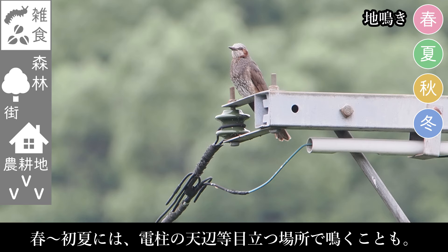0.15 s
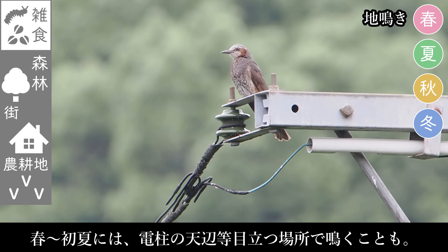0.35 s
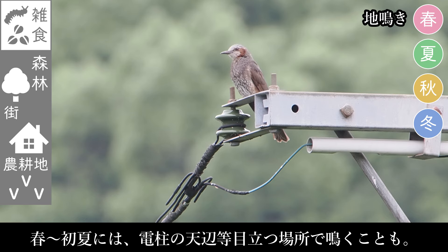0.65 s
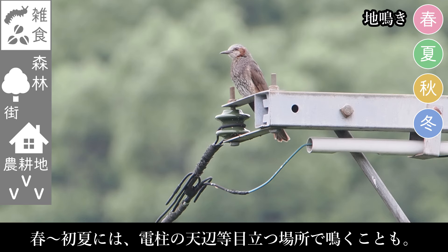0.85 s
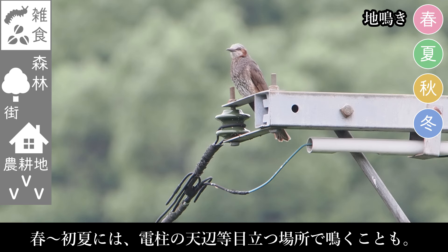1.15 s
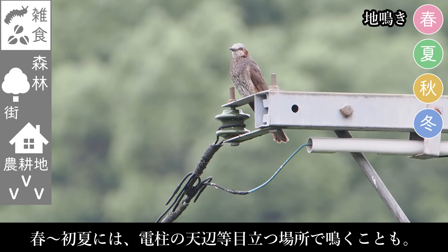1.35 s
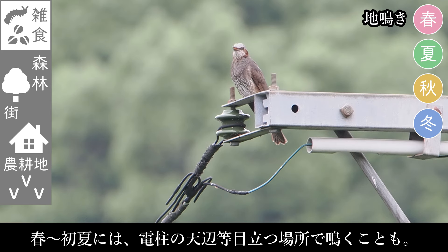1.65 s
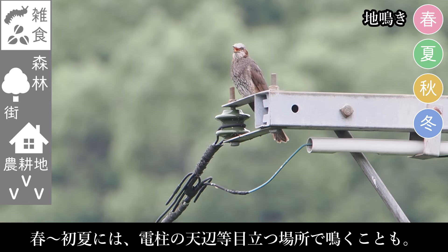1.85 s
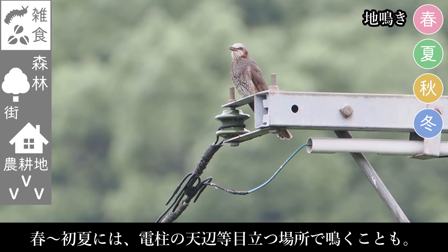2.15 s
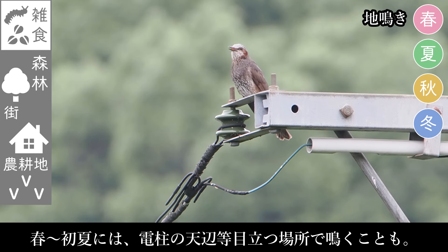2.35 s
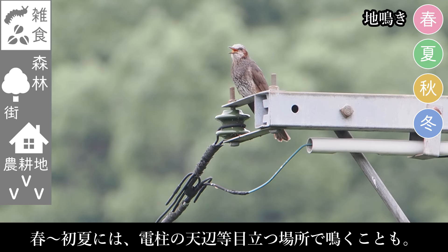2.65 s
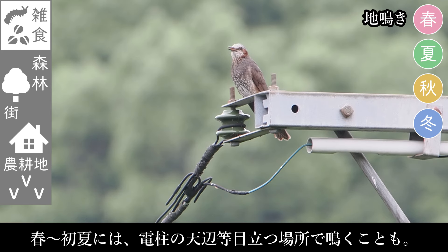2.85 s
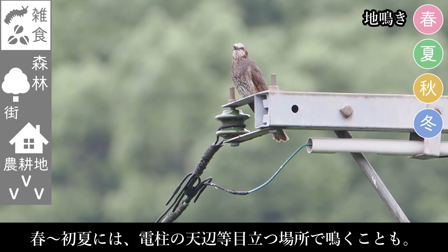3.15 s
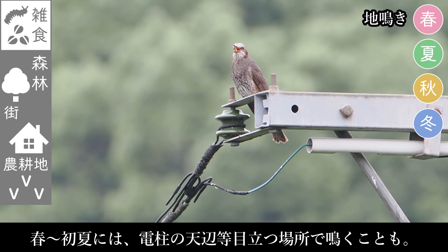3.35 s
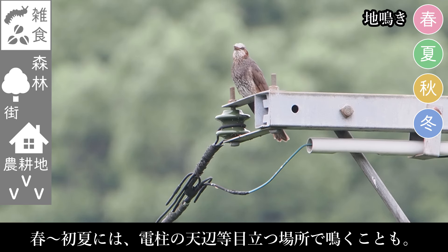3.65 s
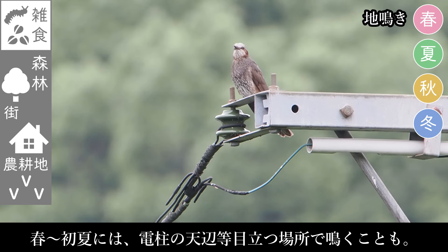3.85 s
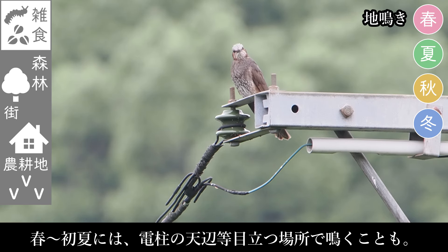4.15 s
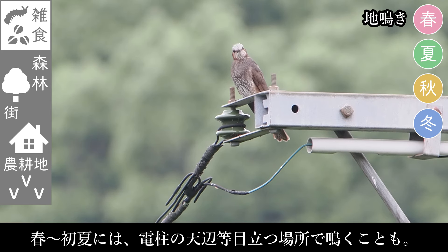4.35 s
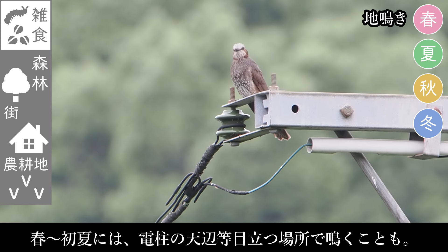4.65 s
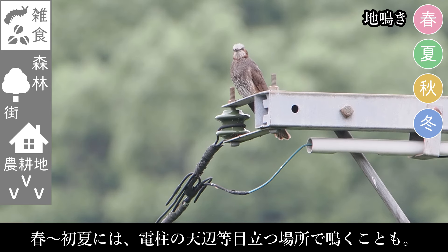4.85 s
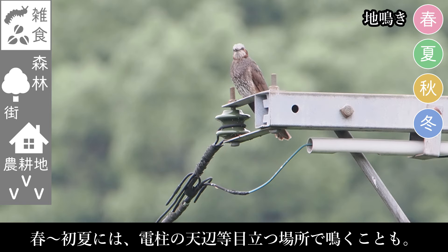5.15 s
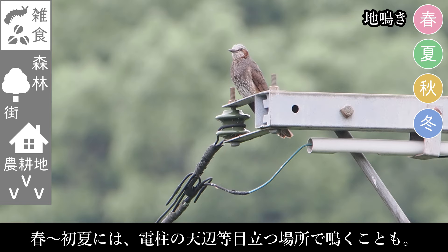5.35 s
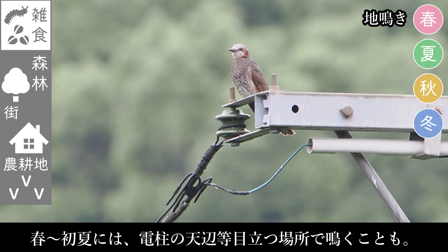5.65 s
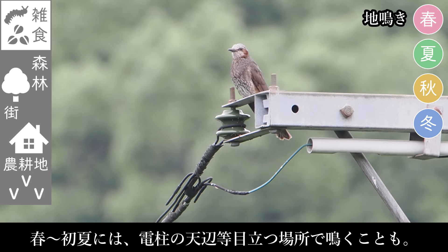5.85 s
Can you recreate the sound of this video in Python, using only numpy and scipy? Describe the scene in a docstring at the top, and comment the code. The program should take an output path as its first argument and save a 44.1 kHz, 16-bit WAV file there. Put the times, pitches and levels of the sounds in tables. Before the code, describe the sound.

A bulbul on a utility pole gives six shrill, raspy calls, the last breaking into chatter; a distant warbler answers with whistle and flourish.

```python
"""A bulbul on a pole, close to the microphones, calls six shrill arches: gliding partials with warble and rasp.
The last one breaks into two-voiced chatter of short glides. A warbler further off answers with a nearly pure
whistle and a quick flourish; far birds give blurred chirps. Dull claps, clicks ringing broad resonances, carry
from the left over a wooded valley. Behind lie filtered noises: a soft rush and a wavering hum on the left,
a draught at the microphones, leaves, low traffic rumble and microphone hiss."""
import sys
import numpy as np
from scipy import signal
from scipy.fft import rfft, irfft, next_fast_len
from scipy.io import wavfile
from scipy.ndimage import uniform_filter1d

SR = 44100
rng = np.random.default_rng(int(sys.argv[2]) if len(sys.argv) > 2 else 0)


def int16_out(signal):
    """Quantize to a 16-bit WAV file."""
    q = np.round(np.clip(np.atleast_2d(signal).T, -1, 1) * 32767)
    wavfile.write(sys.argv[1], SR, q.astype(np.int16))


N = 264732

# Overtones of the near bird, strong on low notes: (main line f/Hz, level/dB at 1.5 x, level/dB at 2 x)
OVERTONES = [(2200, 3.5, 5.5), (2800, -13.5, -13.5), (3300, -15, -25), (4070, -11, -34.5),
             (4900, -13.5, -35.5), (5700, -33, -41.5), (6700, -28.5, -39), (7400, -23, -37)]
# Colour of each kind of call: (shift/dB at 1.5 x, shift/dB at 2 x, shift/dB at 2 x on low notes,
# level/dB at 2.5 x and level/dB at 0.5 x, both against the overtone at 1.5 x)
VOICES = dict(bow=(-6, 7.5, 1.5, -14, -21), arch=(-0.6, -1.5, -0.9, -21, -5),
          squeal=(-22.5, 6.5, 8.5, -21, 1.5), hook=(-6.5, 8, -3, -20, 14), hoarse=(-11, 15, -12, -19, -18))
# Slow second vibration by kind of call: mean rate f/Hz and greatest pitch swing f/Hz
WARBLE_HZ = dict(arch=277, squeal=267)
WARBLE_DEPTH_HZ = dict(arch=457, squeal=452)
# Single chatter notes: (middle t/s, nominal length/ms, start f/Hz, end f/Hz, peak level/dB)
CHATTER = [(3.642, 4.4, 3140, 4170, -19.5), (3.65, 6, 3690, 3630, -26), (3.71, 12, 4120, 5970, -26.5),
           (3.722, 11, 4800, 5900, -31), (3.734, 5, 5800, 6070, -33), (3.741, 6, 5900, 4500, -30),
           (3.746, 6.5, 4300, 3900, -21), (3.759, 23, 2476, 3840, -33), (3.778, 7.8, 3480, 3420, -29),
           (3.798, 6, 2440, 3870, -30), (3.808, 17, 3184, 2800, -29), (3.82, 8, 2760, 2840, -34),
           (3.835, 6.6, 2540, 2650, -34)]


def bulbul():
    """The syrinx vibrates at half the main line; a second, slow vibration warbles pitch and level."""
    out = np.zeros(N)
    line_hz, *overtone_db = np.transpose(OVERTONES)
    for rows, kind, warble in phrases():
        i, edge, (hz, db, rasp) = stroke(rows)
        rasp = np.clip(rasp, 0, 1)
        *shift_db, low_db, fifth_db, sub_db = VOICES[kind]

        # the colour of each voice shows once the note is up
        up = np.clip((hz - 2500) / 1200, 0, 1)
        odd_db, even_db = (np.interp(hz, line_hz, o) + up * s for o, s in zip(overtone_db, shift_db))
        even_db = even_db + low_db * np.clip((3700 - hz) / 700, 0, 1)

        warble_hz, depth_hz = 0, 0 * hz
        if warble:
            begin_s, end_s = warble
            share = np.clip((i / SR - begin_s) / (end_s - begin_s), 0, 1)
            warble_hz, depth_hz = WARBLE_HZ[kind], WARBLE_DEPTH_HZ[kind] * np.sin(np.pi * share)
        beat = 2 * np.pi * np.cumsum(warble_hz * (1 + 0.034 * walk(66, len(i)))) / SR
        phase = 2 * np.pi * np.cumsum(hz + depth_hz * np.sin(beat)) / SR

        third_db = even_db - 12 - 12 * up - 8 * depth_hz / 400 - 6 * rasp
        # (multiple of the main line, level/dB)
        partials = [(.5, odd_db + sub_db), (1, 0 * db), (1.5, odd_db), (2, even_db),
                    (2.5, odd_db + fifth_db - 6 * rasp), (3, third_db)]
        tone = 0
        for k, partial_db in partials:
            # in a rasp the cycles lose their order: each line spreads into a band
            carrier = chaos(rasp, 2400, len(i)) * np.exp(1j * k * phase)
            tone = tone + undb(partial_db) * carrier.imag * (k * hz < 16000)
        waver_db = (.6 + 1.2 * rasp) * walk(150, len(i))
        throb_db = 3.4 * np.sin(beat + 1.7) * depth_hz / 400 + waver_db
        out[i] += np.sqrt(2) * edge * tone * undb(db + throb_db)
    chatter = chips(CHATTER + trills(), -29.5, 0.27)
    # the small throat radiates nothing low and little at the very top
    throat = signal.butter(4, [2300, 13500], "band", fs=SR, output="sos")
    return signal.sosfilt(throat, out + chatter)


# First call, a clear bow ending in a scratch: (t/s, main line f/Hz, level/dB, rasp 0-1)
BOW = [(1.662, 1920, -56, 0.3), (1.676, 2940, -41, 0.6), (1.69, 3425, -32.5, 0.26),
       (1.71, 3860, -28.5, 0.06), (1.735, 4074, -25, .02), (1.755, 3976, -22.5, 0.14),
       (1.763, 3460, -24, .15), (1.77, 2600, -32, 0.7), (1.776, 2897, -31, .9), (1.782, 4200, -28, 1),
       (1.805, 3350, -30, .7), (1.824, 3300, -34, .9), (1.83, 4600, -27.5, 0.2), (1.836, 2890, -32.5, .9),
       (1.85, 2500, -36.5, .9)]
# Hoarse breathiness beneath the chatter: (t/s, main line f/Hz, level/dB, rasp 0-1)
UNDERTONE = [(3.636, 3650, -40.5, 0.74), (3.71, 4580, -40.5, .99), (3.75, 4010, -65, 1),
             (3.85, 2700, -63, 0.78)]
# Last call, a loud warbled squeal: (t/s, main line f/Hz, level/dB, rasp 0-1)
SQUEAL = [(3.418, 1800, -60, .2), (3.425, 2249.5, -45.5, .1), (3.43, 2616, -34.5, .2),
          (3.44, 3041, -29.5, .02), (3.455, 3850, -28.5, .02), (3.475, 4284, -24.5, 0.16),
          (3.505, 4720.5, -23, 0.2), (3.53, 4520.5, -20, 0.12), (3.56, 4200, -21, 0.07),
          (3.578, 4100, -22.5, 0.1), (3.594, 4100, -26.5, .2)]
# Ending of the squeal: (burst t/s, level/dB, rise of the hook's last two points f/Hz, lift of the hook level/dB)
SQUEAL_END = (3.6, -21.5, 350, 1.5)
# Span of the squeal's warble: (begin t/s, end t/s)
SQUEAL_WARBLE_S = (3.45, 3.595)
# Four high arches of one shape:
# (start t/s, burst t/s, top f/Hz, level/dB, level along the top/dB, lift of the closing hook level/dB)
ARCHES = [(2.056, 2.178, 7530, -19, -29.5, 3), (2.395, 2.51, 7540, -19.5, -32.5, -0.2),
          (2.738, 2.85, 7260, -22, -35, -.1), (3.101, 3.218, 7480, -19, -29.5, -3)]
# Low opening step and jump: (t/s after the start, main line f/Hz, level/dB against the arch, rasp 0-1)
ARCH_ONSET = [(.002, 2230, -38, .4), (.007, 2402, -22.5, .7), (.011, 4040, -6, 0.5), (.018, 3945, -11, .1),
              (.026, 4200, -10, .15), (.033, 5637, -8.5, .2)]
# Climb to the top and plunge: (t/s before the burst, share of top f, level/dB against the top)
ARCH_TOP = [(.062, .9, -1), (.037, .98, -2.5), (.022, 1.005, 2.5), (.012, .965, -5), (.008, .84, -0.5),
            (.004, .56, 7.5)]
# Warble of an arch: (begin t/s after the start, end t/s before the burst)
ARCH_WARBLE_S = (.015, 0.017)


def phrases():
    """The bird's long calls as rows (t/s, f/Hz, level/dB, rasp) with kind and span of warble."""
    burst, db, lift_hz, hook_db = SQUEAL_END
    end = np.array(coda(burst, db, hook_db)[:-1])
    end[-2:, 1] += lift_hz
    calls = [(BOW, "bow", None), (UNDERTONE, "hoarse", None),
             (SQUEAL + list(end[:2]), "squeal", SQUEAL_WARBLE_S), (end[1:], "hook", None)]
    after_start, before_burst = ARCH_WARBLE_S
    for start, burst, top_hz, db, top_db, hook_db in ARCHES:
        rows = [(start + s, hz, db + d, rasp) for s, hz, d, rasp in ARCH_ONSET]
        rows += [(burst - s, share * top_hz, top_db + d, .1) for s, share, d in ARCH_TOP]
        rows += coda(burst, db, hook_db)
        calls.append((rows, "arch", (start + after_start, burst - before_burst)))
    return calls


# Low burst, hoarse gap and small hook: (t/s after the burst, main line f/Hz, level/dB against the call, rasp 0-1)
CODA = [(0, 2858, -0.5, .25), (.007, 2830, -22.5, 1), (.012, 3142, -3, .8), (.018, 4822, -18.5, .2),
        (.024, 4430, -5.5, .1), (.033, 4150, -9.5, .1), (.038, 3104, -11, .65), (.047, 3100, -15.5, .9)]


def coda(burst, db, hook_db):
    """The ending placed at its burst; the hook is the part from the fifth row on."""
    return [(burst + s, hz, db + d + hook_db * (k > 3), rasp)
            for k, (s, hz, d, rasp) in enumerate(CODA)]


# Runs of evenly spaced chatter notes: (first t/s, last t/s, nominal length/ms, glide f/Hz,
# first f/Hz, last f/Hz, first level/dB, last level/dB)
TRILLS = [(3.667, 3.697, 6.5, 120, 3950, 4250, -20, -22), (3.663, 3.702, 5.4, -400, 4630, 5650, -32, -31.5),
          (3.675, 3.728, 7.8, -350, 2570, 2790, -31, -31.5),
          (3.77, 3.783, 6, -950, 2720, 2690, -23.5, -23.5), (3.789, 3.841, 7, -200, 2705, 2490, -32, -39.5)]


def trills():
    """The runs, one note about every 14 ms, spelled out as single glides."""
    notes = []
    for first, last, ms, glide_hz, first_hz, last_hz, first_db, last_db in TRILLS:
        count = round((last - first) / .014) + 1
        for s, hz, db in np.linspace((first, first_hz, first_db), (last, last_hz, last_db), count):
            notes.append((s, ms, hz - glide_hz / 2, hz + glide_hz / 2, db))
    return notes


# Long whistle from further off: (t/s, f/Hz, level/dB)
WHISTLE = [(4.05, 1380, -70), (4.45, 1383, -55), (4.6, 1392, -58), (4.72, 1392, -49), (4.8, 1384, -45.5),
           (4.825, 1352, -63)]
# Quick flourish, one list per note: (t/s, f/Hz, level/dB)
FLOURISH = [
    [(4.862, 1600, -47), (4.875, 1482, -34), (4.895, 1263, -42), (4.912, 1853, -32), (4.921, 2037, -34),
     (4.932, 2070, -53.5)],
    [(4.982, 3140, -47), (4.988, 2673, -32), (4.995, 2564, -24.5), (5.004, 3026, -28.5), (5.009, 3120, -54)],
    [(5.014, 2950, -46.5), (5.02, 2850, -27), (5.027, 2030, -28)],
    [(5.084, 2930, -34), (5.092, 2153, -31.5), (5.101, 1736, -34), (5.12, 2253, -29), (5.144, 2680, -24),
     (5.15, 3250, -33.5), (5.158, 3840, -50.5), (5.17, 3670, -35.5)],
    [(5.238, 4070, -56), (5.246, 2890, -29), (5.258, 3040, -30), (5.272, 2478, -28.5), (5.287, 2136, -30.5),
     (5.315, 1664, -37.5), (5.332, 1216, -45)],
]


def warbler():
    """Nearly pure tones: a steady swelling whistle, then fast glides that flutter on their way through the leaves."""
    out = np.zeros(N)
    soft = np.hanning(160) / 80
    for rows, flutter in [(WHISTLE, .2)] + [(note, .3) for note in FLOURISH]:
        i, edge, (hz, db) = stroke(rows)
        phase = 2 * np.pi * np.cumsum(hz) / SR
        swell = np.convolve(edge * undb(db), soft, "same")
        tone = (chaos(flutter, 250, len(i)) * np.exp(1j * phase)).imag
        out[i] += np.sqrt(2) * edge * swell * tone
    return out


# Chirps of far birds: (middle t/s, nominal length/ms, start f/Hz, end f/Hz, peak level/dB)
FAR_CHIRPS = [(1.02, 60, 2400, 3900, -61), (1.16, 25, 2500, 3370, -60), (1.24, 70, 3500, 2594, -57),
              (1.48, 45, 2500, 3860, -58.5)]


def far_chirps():
    """Short glides of far birds, blurred almost into noise bands."""
    return chips(FAR_CHIRPS, -19.5, 0.91)


# Claps from across the valley: (t/s, level/dB, rattle decay/s, tilt/dB per octave, lowest f/Hz, highest f/Hz)
CLAPS = [(0.002, -52.5, 0.01, 1, 500, 3500), (.136, -34.5, 0.067, -1, 830, 6470),
         (2.296, -44, 0.045, 5.5, 725, 5000), (5.203, -42.5, 0.085, 1, 540, 2950)]
# Broad resonances of the claps: (f/Hz, width f/Hz, level/dB before the tilt)
CLAP_BODY = [(607, 250, -4.5), (870, 270, -5.5), (1235, 747, 5.5), (1584, 500, 1.5), (2284, 125, 5),
             (3400, 650, -2.5), (4600, 610, -26)]


def claps():
    """Each clap is a short rattle of uneven clicks that ring a few broad resonances; distance trims both ends."""
    out = np.zeros(N)
    t = np.arange(SR // 4) / SR
    for s, db, length_s, bright_db, low_hz, high_hz in CLAPS:
        sizes = rng.standard_normal(len(t)) * undb(3.5 * walk(113, len(t)))
        rise = np.clip(t / .01, 0, 1)
        rattle = sizes * rise * np.exp(-(t / length_s) ** 2)
        ring = 0
        for hz, width_hz, mode_db in CLAP_BODY:
            mode = signal.butter(2, [hz - width_hz / 2, hz + width_hz / 2], "band", fs=SR, output="sos")
            tilt_db = bright_db * np.log2(hz / 1500)
            ring = ring + undb(mode_db + tilt_db) * signal.sosfilt(mode, rattle)
        trim = signal.butter(2, [low_hz, high_hz], "band", fs=SR, output="sos")
        ring = signal.sosfilt(trim, ring)
        loudness = np.sqrt(np.mean(ring[:int(length_s * SR)] ** 2))
        at = int(s * SR)
        out[at:at + len(t)] += undb(db) * ring / loudness
    return out


# Spectrum of the rush: (f/Hz, relative level/dB)
RUSH = [(88, -39), (150, -8.5), (377, -17.5), (420, -16.5), (463, -16), (546, -12.5), (601, -10),
        (1310, 1.5), (1370, -0.5), (1830, -3.5), (4000, -45), (5200, -54.5), (8800, -120)]
# Course of the rush before it is placed: (t/s, level/dB)
RUSH_DB = [(0, -52.5), (.95, -58), (1.5, -54.5), (2, -53), (2.9, -56.5), (3.5, -52), (4.4, -56.5), (5, -54),
           (5.5, -58.5), (6, -60.5)]


def rush():
    """Soft broad noise, stronger and three samples earlier at the left microphone."""
    left, right = coloured(RUSH, 0, 0.57, 1.7) * undb(curve(RUSH_DB)[0])
    return np.array([np.roll(left, -3) * undb(3.5), right * undb(-1.0)])


# Course of the hum before it is placed: (t/s, level/dB)
HUM_DB = [(0, -74), (1, -78), (1.4, -65.5), (3.05, -78), (3.12, -60), (3.2, -78), (6, -82)]


def hum():
    """A narrow noise band around 460 Hz wavers like a hum, 8 dB stronger on the left."""
    spectrum = [(380, -59), (430, -11.5), (460, 0.5), (500, -10.5), (560, -55.5)]
    return coloured(spectrum, 0, 0.93, 2.8) * undb(curve(HUM_DB)[0] + [[4], [-4]])


def draught():
    """Air moving past the microphone ports murmurs in each on its own, more on the left."""
    spectrum = [(100, -42.0), (200, -1.5), (350, -4.0), (700, -1.5), (1100, -7.5), (2000, -70.5)]
    return coloured(spectrum, -69, 0, 1.8) * undb([[3], [-3]])


# Course of the leaves: (t/s, level/dB)
LEAVES_DB = [(0, -60.5), (.9, -64), (1.6, -58), (2.7, -66.5), (3.1, -71), (3.45, -69), (4, -92), (5.3, -71),
             (6, -78)]


def leaves():
    """Treble noise of leaves, half alike in both microphones, that quietens."""
    spectrum = [(1500, -27), (2400, -5.5), (4000, -19.0), (7500, -24), (9000, -26), (12000, -70)]
    return coloured(spectrum, 0, .5, 0.94) * undb(curve(LEAVES_DB)[0])


# Spectrum of the traffic rumble: (f/Hz, relative level/dB)
RUMBLE = [(12, -36.5), (20, -8), (70, 5), (88, 2.5), (193, -17.5), (300, -25.5), (390, -51), (660, -120)]


def rumble():
    """Low traffic noise, nearly alike in both microphones, three samples earlier on the left."""
    left, right = coloured(RUMBLE, -57, 0.93, 1.0)
    return np.array([np.roll(left, -3), right])


# Spectrum of the microphone hiss: (f/Hz, relative level/dB)
HISS = [(1760, -44.5), (3000, -26.5), (3330, -20), (7010, -18), (9300, -6.5), (9960, -5.5), (11800, -4.5),
        (15600, -5)]


def hiss():
    """Microphone noise, almost unrelated between the two sides."""
    return coloured(HISS, -67.5, .05, .3)


def background():
    """All steady layers of the place and the microphones together."""
    return rush() + hum() + draught() + leaves() + rumble() + hiss()


def undb(db):
    """Decibels to gain."""
    return 10 ** (np.asarray(db) / 20)


def curve(rows):
    """Columns of a (t/s, ..) table at every sample."""
    s, *columns = np.transpose(rows)
    return [np.interp(np.arange(N) / SR, s, c) for c in columns]


def stroke(rows):
    """Sample span, 1.1 ms soft edges and columns of one note."""
    s, *columns = np.transpose(rows)
    i = np.arange(int(s[0] * SR), int(s[-1] * SR))
    edge = np.clip(np.minimum(i - i[0], i[-1] - i) / (0.0011 * SR), 0, 1)
    return i, edge, [np.interp(i / SR, s, c) for c in columns]


def chips(table, overtone_db, rasp):
    """Short, hoarse glides with one overtone at 2 x and round envelopes."""
    out = np.zeros(N)
    for s, ms, start_hz, end_hz, db in table:
        n = int(1.2 * ms * SR / 1000)  # the round window spans 1.2 nominal lengths
        phase = 2 * np.pi * np.cumsum(np.linspace(start_hz, end_hz, n)) / SR
        tone = np.exp(1j * phase) + undb(overtone_db) * np.exp(2j * phase)
        hoarse = (chaos(rasp, 1500, n) * tone).imag
        at = int(s * SR) - n // 2
        out[at:at + n] += np.sqrt(2) * undb(db) * np.hanning(n) * hoarse
    return out


def chaos(share, rate, size):
    """Complex carrier gain: steady at share 0, a band of noise at share 1."""
    share = np.clip(share, 0, 1)
    noise = (walk(rate, size) + 1j * walk(rate, size)) / np.sqrt(2)
    return np.sqrt(1 - share ** 2) + share * noise


def walk(rate, size=N):
    """Smooth chance that turns about rate times a second; spread 1."""
    k = max(int(SR / rate), 1)
    x = rng.standard_normal(size + 4 * k)
    x = uniform_filter1d(uniform_filter1d(x, k), k)[2 * k:2 * k + size]
    return x * np.sqrt(1.5 * k)  # restores the spread lost in smoothing


def coloured(spectrum, db, alike, flicker_db):
    """Two-channel noise with a spectrum; half-octave bands flicker on their own."""
    size = next_fast_len(N)
    hz = np.fft.rfftfreq(size, 1 / SR) + 1
    points = np.array(spectrum)
    gain = undb(np.interp(np.log(hz), np.log(points[:, 0]), points[:, 1]))
    mid, side = rfft(rng.standard_normal((2, size))) * gain
    alike = np.clip(alike, 0, 1)
    pair = np.sqrt(1 + alike) * mid + np.sqrt(1 - alike) * side * np.array([[1], [-1]])
    out = 0
    for band in range(8, 29):
        share = np.clip(1 - abs(2 * np.log2(hz) - band), 0, 1)
        if (share * gain).max() > 1e-3:  # skip silent bands
            out = out + irfft(pair * share, size)[:, :N] * undb(flicker_db * walk(3.9))
    return out * undb(db) / np.sqrt(np.mean(out.mean(axis=0) ** 2))


def valley(x, wet_db, t60_s, rise_s, alike, top_hz):
    """Scatter from trees and slopes: a dense tail that builds up and dies away, duller than the direct sound."""
    t = np.arange(SR) / SR
    mid, side = rng.standard_normal((2, SR))
    tail = mid + (1 - np.clip(alike, 0, 1)) * side * np.array([[1], [-1]])
    tail = tail * undb(1.1 * walk(40, SR))
    tail = tail * (1 - np.exp(-t / rise_s)) * undb(-60 * t / t60_s)
    tail = signal.lfilter(*signal.butter(1, top_hz, fs=SR), tail)
    tail = tail / np.sqrt(np.sum(tail[0] ** 2))
    return undb(wet_db) * signal.fftconvolve(x[None], tail, axes=1)[:, :N]


def place(x, pan_db, lag):
    """Left-over-right level in dB and samples that the left trails (negative: leads)."""
    return np.array([np.roll(x, lag) * undb(pan_db / 2), x * undb(-pan_db / 2)])


def scene():
    """Near bird nearly dry with a quick and a slow tail, far sounds with more scatter."""
    near, far, clap, chirps = bulbul(), warbler(), claps(), far_chirps()
    slope_t60_s = .48
    mix = place(near, -0.76, 0)
    mix = mix + valley(near, -9.0, .22, 0.0072, 0.2, 9000)
    mix = mix + valley(near, -16, slope_t60_s, 0.01, 0.23, 4900)
    mix = mix + place(far, 0.093, -1) * undb(-3.0)
    mix = mix + valley(far, -9, 0.42, 0.0065, 0.64, 5200)
    mix = mix + chirps + valley(chirps, 1.3, 0.15, .008, 0.13, 7800)
    mix = mix + place(clap, 9.9, -2)
    clap_tail = valley(clap, -7.5, slope_t60_s, 0.0077, 0.72, 2400)[0]
    return mix + place(clap_tail, 6.6, -2) + background()


def record(dry):
    """The recorder cuts the top steeply above 15760 Hz."""
    return signal.sosfilt(signal.ellip(10, .2, 80, 15760, fs=SR, output="sos"), dry)


dry = scene()
out = record(dry)
int16_out(out)
```